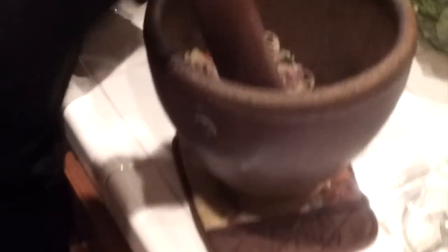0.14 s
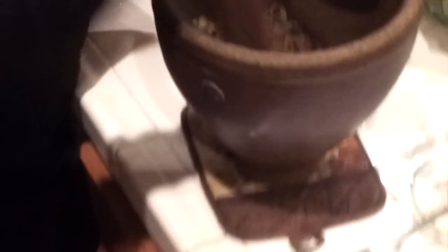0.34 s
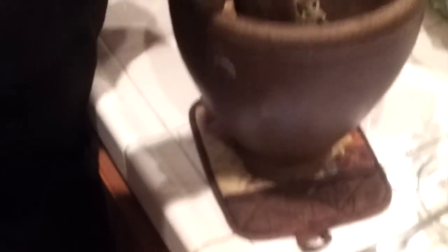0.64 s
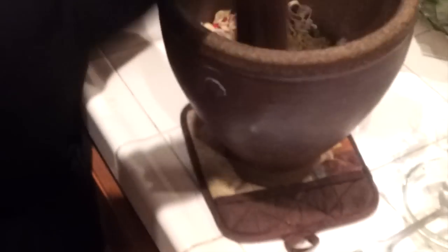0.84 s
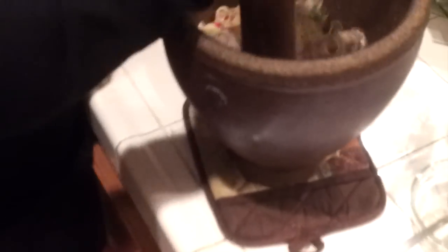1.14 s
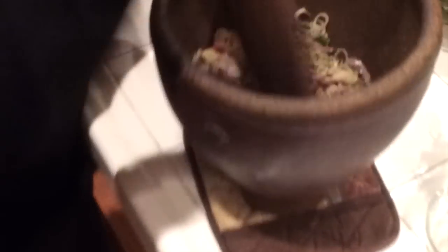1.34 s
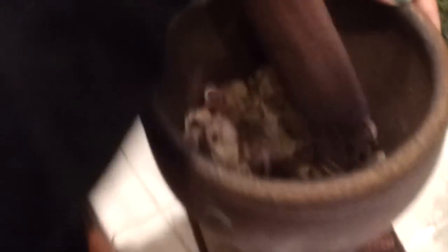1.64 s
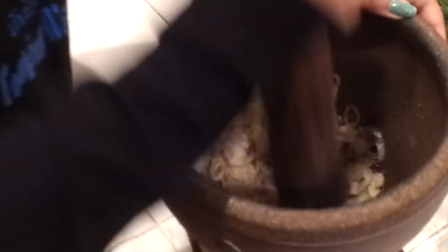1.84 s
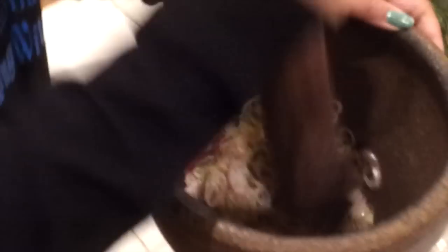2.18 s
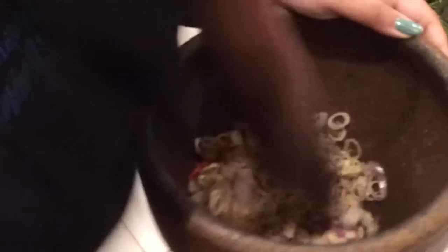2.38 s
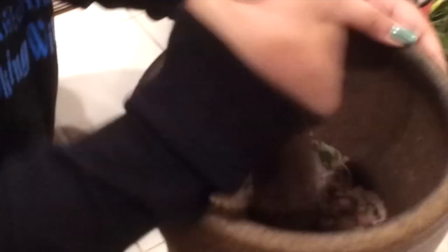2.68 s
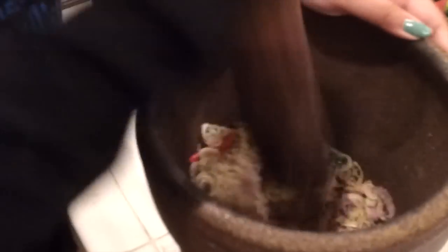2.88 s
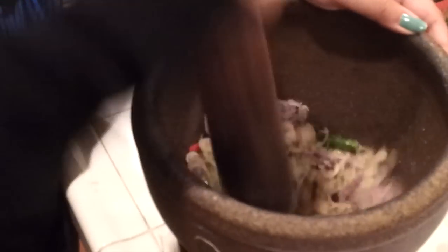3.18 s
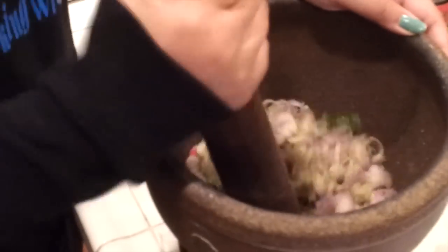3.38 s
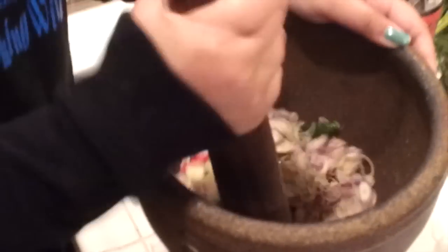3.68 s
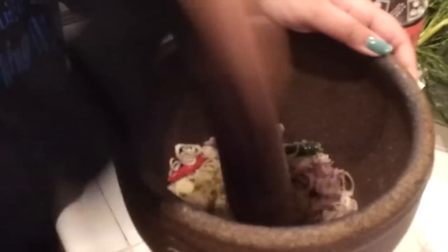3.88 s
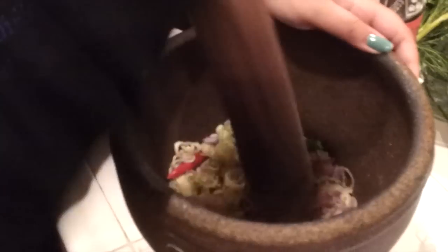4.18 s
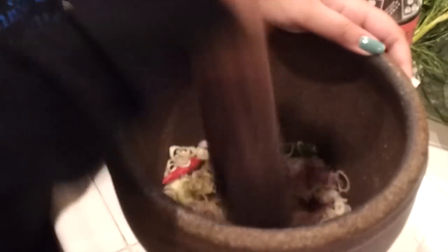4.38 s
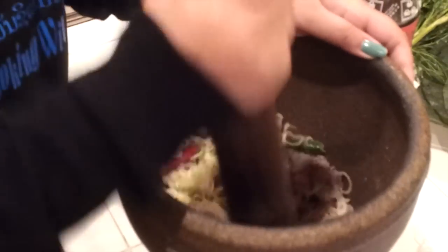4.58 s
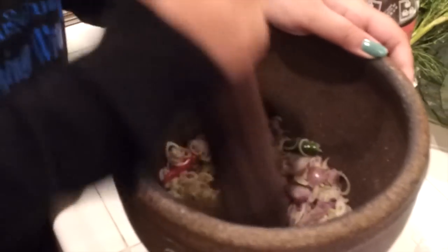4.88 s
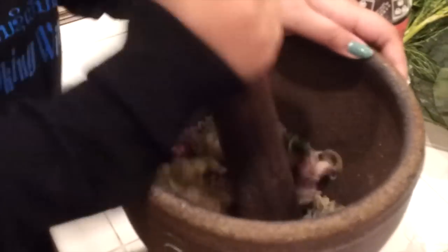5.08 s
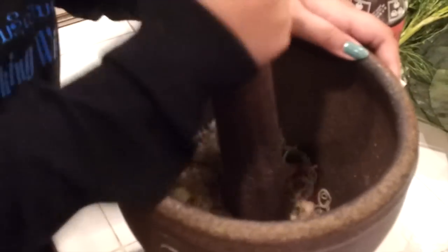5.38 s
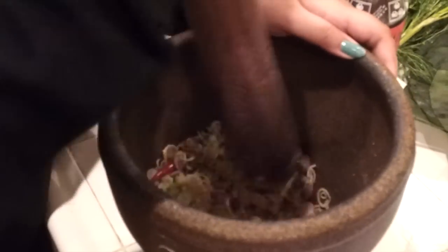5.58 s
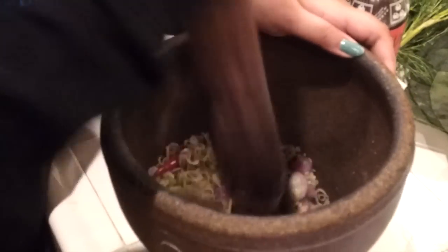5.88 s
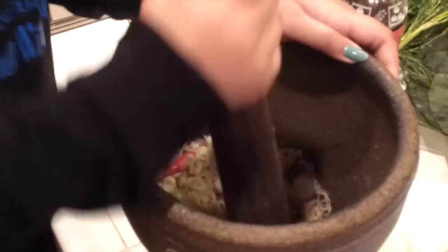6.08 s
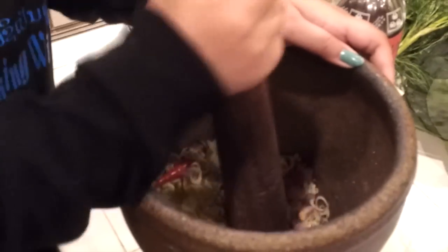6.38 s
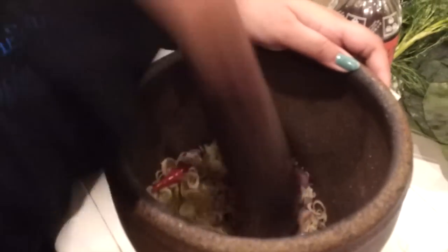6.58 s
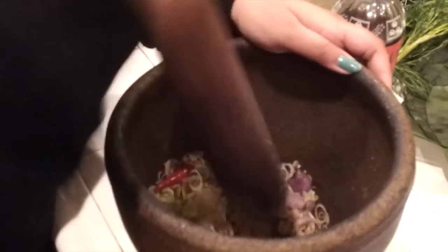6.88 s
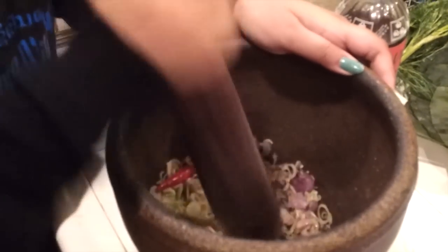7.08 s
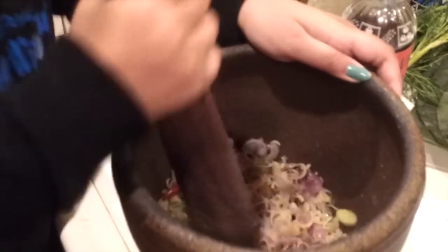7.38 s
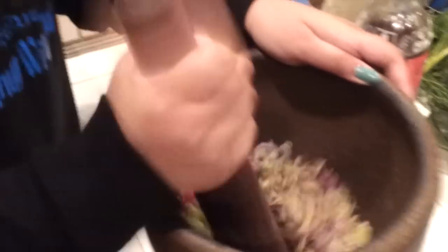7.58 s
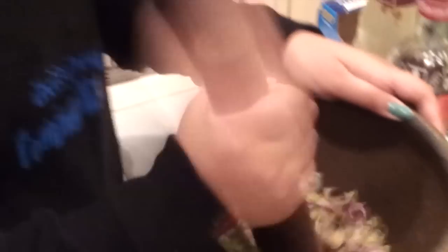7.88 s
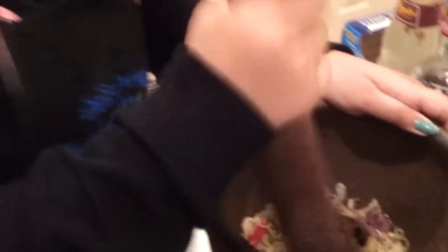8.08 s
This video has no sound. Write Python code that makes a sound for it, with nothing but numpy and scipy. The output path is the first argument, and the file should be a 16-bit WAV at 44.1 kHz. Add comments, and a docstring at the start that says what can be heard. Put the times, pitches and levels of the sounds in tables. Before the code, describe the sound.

Close up in a small tiled kitchen, a wooden pestle pounds sliced herbs in a clay mortar at about three strokes a second. Each stroke gives a short fibrous crunch and a low padded thud through the counter. Early strokes are softer; a few later ones crack loudly on bare clay, and glass and metal on the counter rattle briefly. Faint room hiss stays beneath.

```python
"""On a padded kitchen counter a wooden pestle pounds sliced herbs in a clay mortar, about three strokes a second.
Snapping fibres crunch as filtered pulses; thumps excite decaying modes of the counter and a cupboard rumble.
Knocks ring the clay modes, at some strokes glass and metal chatter, and a faint squeak and bumps occur.
Shaped noise gives the room's hiss, and convolution with decaying noise gives its echoes."""
import sys
import numpy as np
from scipy import signal
from scipy.fft import rfft, irfft
from scipy.io import wavfile
from scipy.ndimage import uniform_filter1d

SR = 44100
rng = np.random.default_rng(int(sys.argv[2]) if len(sys.argv) > 2 else 0)


def wav_record(signal):
    """Record a signal, one row per channel, as 16-bit PCM in the file named by sys.argv[1]."""
    frames = np.transpose(np.atleast_2d(signal))
    bounded = np.clip(frames, -1, 1)
    # unit amplitude maps onto the largest positive 16-bit level
    quanta = np.round(bounded * 32767).astype(np.int16)
    wavfile.write(sys.argv[1], SR, quanta)


N = 363384

# All levels in the tables are relative.
# room noise: (time [s], hum level [dB], hiss level [dB])
ROOM_NOISE = [(0, -54, -52), (1.0, -55, -55), (3.0, -55.5, -55), (5.0, -55, -55.5), (7.0, -57, -57.5),
              (8.24, -55, -58)]
# room noise spectrum: (frequency [Hz], density [dB per Hz])
ROOM_NOISE_COLOUR = [(18, -45), (30, -25), (59, 1), (187, 5.5), (787, 2), (1110, 1), (2240, -6),
                     (6540, -2.5), (11300, -16), (13600, -15.5), (15500, -27)]
# faint soft bumps nearby: (time [s], level [dB], frequency [Hz])
BUMPS = [(.004, -39, 714), (0.086, -42.5, 305), (.115, -44, 417), (.160, -48, 231), (0.565, -45, 216)]
# reverberation bands: (centre [Hz], t60 [s], echo level [dB])
ECHO_BANDS = [(125, 0.3, -13.5), (356, 0.4, -8.5), (950, 0.49, -12.5), (2470, 0.54, -15.5),
              (5800, 0.48, -16.5), (11900, 0.42, -16.5)]
# pushes into the herbs: (first bite [s], bite level [dB], delay to full pressure [ms],
# crush level [dB], letting go by 10 dB [ms], extra bass [dB])
HERB_PUSHES = [(0.35, -41, 42, -32, 36, -2), (.399, -45, 21, -26.5, 19, 0.5),
               (0.739, -34, 21, -30.5, 33, 1), (1.072, -32, 17, -26.5, 25, 4), (1.406, -45, 14, -27, 43, 7),
               (1.737, -27, 19.5, -19.5, 8.8, -4), (2.058, -36, 9.4, -20, 15.5, 0),
               (2.41, -39, 25.5, -25, 14.7, 6), (2.702, -33, 18.5, -22, 9, 1), (2.997, -52, 23, -23, 15, 4),
               (3.342, -29.5, 18.5, -18.5, 9.7, 0.5), (3.639, -25.5, 19, -22, 13, 1),
               (3.908, -43, 18.7, -25.5, 12, 7), (4.218, -39, 12.4, -23.5, 20, 4.5),
               (4.507, -35, 13, -22, 16, 8), (4.794, -48, 8.3, -19, 7.1, 0), (4.817, -43, 10, -31, 24, 8),
               (5.077, -25.5, 20.7, -23, 10.6, -0.5), (5.358, -34, 27.4, -27, 6.2, 4),
               (5.682, -39.5, 16, -22, 14.4, 3.5), (6.009, -26.5, 17, -20.5, 11, 0),
               (6.337, -34, 18, -25, 88, 10), (6.638, -46.5, 13.2, -22.5, 7.2, 3.5),
               (6.953, -37, 15.5, -22.5, 16, 11.5), (7.273, -30.5, 35.4, -25, 11.5, 3),
               (7.588, -44.5, 21, -23, 9.8, 10), (7.899, -24, 20.4, -22, 8, -1),
               (8.191, -25, 24, -22.5, 20, -16)]
# crunch spectrum: (frequency [Hz], density [dB per Hz])
HERB_COLOUR = [(250, -21.5), (450, -15), (800, -17), (1200, -9), (1900, 0.5), (4600, -4.5), (6000, 0),
               (8000, -8), (12500, -22), (15000, -20)]
# pestle jarring the clay, hard on the bare wall or dull through the herbs:
# (time [s], level [dB], extra hollow modes [dB], extra wall modes [dB])
KNOCKS = [(0.351, -28.5, 8, 0), (.381, -29.5, -16, -2), (.755, -44.5, 25, 15), (1.108, -34.5, -7, 15),
          (1.414, -42, 26, -6), (1.745, -42, 23, 7), (2.068, -28, 18, 3), (3.341, -22.5, -9, -19),
          (3.637, -21, 17, 8), (3.943, -20.5, 4, 11), (4.26, -27, 7, -8), (4.497, 8.5, -4, -1.5),
          (4.819, -43, -1, 18), (5.066, -25, -8, -20.5), (5.378, -30.5, 7, -11), (6.017, -23.5, 0.5, -7),
          (6.373, -9.5, -4, 1), (6.641, -28, 6, -6), (6.983, -14.5, -6.5, 4), (7.575, -1, 2.5, -11),
          (7.579, -5, -15, 4.5), (7.583, -8.5, -11, -14), (7.893, -26, -12, -21), (8.178, 2, 3, -2)]
# modes of the clay bowl: (frequency [Hz], level [dB], t60 [s])
MORTAR_MODES = [(440, -14.5, 0.045), (445, -19.5, 0.089), (497, -25.5, 0.033), (723.8, -15, 0.23),
                (757, -16.5, 0.2), (824, -17.5, 0.11), (943, -21.5, .09), (1015, -17.5, 0.08),
                (1153, -15, 0.11), (1221, 2.5, 0.032), (1166, -14.5, 0.15), (1246, -17.5, 0.1),
                (1310, -40, 0.095), (1291, -24, 0.13), (1312, -39, 0.22), (1817, -16.5, 0.066),
                (1980, -17.5, 0.048), (2453, -16.5, 0.04), (2805, -10.5, 0.03), (3410, -20, 0.064),
                (3730, -28, 0.029), (4040, -16.5, 0.047), (5460, -2.5, 0.011)]
# thumps on the counter: (time [s], low mode level [dB], upper mode level [dB])
THUMPS = [(0.353, -47.5, -47), (0.759, -31, -36), (1.087, -37, -34), (1.424, -36, -26.5),
          (1.764, -41.5, -51), (2.072, -35.5, -39.5), (2.437, -39, -34.5), (2.726, -33.5, -38.5),
          (3.021, -28.5, -41), (3.357, -37, -40.5), (3.636, -33, -38.5), (3.923, -26.5, -25.5),
          (4.236, -28.5, -30), (4.493, -36.5, -35.5), (4.812, -31, -34.5), (5.071, -45, -43.5),
          (5.39, -36.5, -47.5), (5.71, -31, -39.5), (6.025, -33, -40.5), (6.354, -23.5, -24.5),
          (6.662, -33.5, -38.5), (6.966, -28.5, -24.5), (7.276, -47.5, -47), (7.573, -43, -41),
          (7.91, -39.5, -41), (8.174, -43, -36)]
# modes of the counter: (frequency [Hz], level [dB], t60 [s])
COUNTER_MODES = [(64.5, -5, 0.24), (58.5, -2, 0.23), (76.7, -3.5, 0.17), (98, -12, 0.13), (129.4, 1, 0.124),
                 (166, -4, 0.099), (209.5, -10.5, 0.14), (291.5, -8, 0.092), (405, -6.5, 0.061)]
# cupboard rumble spectrum: (frequency [Hz], density [dB per Hz])
RUMBLE_COLOUR = [(35, -14), (60, 3), (130, 7.5), (250, -1.5), (450, -27.5)]
# things jumping on the counter: (time [s], ring level [dB], dull clatter level [dB], high ring level [dB])
JUMPS = [(.772, -27, -33, -60), (1.1, -22.5, -28, -51), (1.442, -15, -17, -17.5),
         (1.451, -18.5, -22, -18.5), (1.738, -32, -23.5, -37), (2.735, -36, -30, -62),
         (3.037, -28, -36, -57), (3.943, -15, -12, -19), (3.957, -20, -13, -50),
         (4.259, -13.5, -16.5, -21.5), (4.817, -19.5, -25, -27), (5.714, -19, -30.5, -33),
         (6.376, -16, -6, -15.5), (6.393, -13, -15.5, -26), (6.398, -9.5, -13, -10), (6.668, -33, -28, -38),
         (6.985, -16, -16, -30), (6.991, -11, -10.5, -16.5), (7.001, -10.5, -14.5, -18),
         (7.024, -23, -32, -38)]
# modes of the glass and metal before detuning: (frequency [Hz], level [dB], t60 [s])
CROCKERY_MODES = [(950, -9.5, 0.008), (1502, 5.5, 0.0048), (1517, -14.5, 0.054), (1889, -15, 0.089),
                  (2637, -5, 0.015), (3447, -7.5, 0.039), (3640, -14, 0.036), (4160, -14, 0.0059),
                  (4500, -11.5, 0.016), (5550, -12.5, 0.051), (6180, -4, 0.019), (6446, -8.5, 0.037),
                  (6330, 0.5, 0.024), (7000, -6, 0.024), (6910, -11.5, 0.05), (6740, -17, 0.14),
                  (6600, 0, 0.038), (7200, -8.5, 0.045), (8200, -6.5, 0.0183), (9280, -12, 0.087),
                  (9810, -3.5, 0.024), (11000, -22, 0.057), (11670, -18.5, 0.096), (13700, -16, 0.076),
                  (13420, -10, 0.034), (14100, -13.5, 0.0406), (14330, -5, 0.04)]
# spectrum of grating contacts: (frequency [Hz], density [dB per Hz])
GRATING_COLOUR = [(500, -29), (1200, 4.5), (2000, -9.5), (4500, 1), (7000, -27), (10000, -24.5),
                  (15000, -32)]
# faint thin squeak: (time [s], length [s], frequency [Hz], level [dB])
SQUEAKS = [(3.495, .12, 3570, -54)]

# Rise and fall times of pressure are those of a 10 dB change.
BITE_RISE_MS, BITE_FALL_MS, BITE_BASS_DB, BITE_TREBLE_DB = 3.8, 6.3, 4, 7
SWELL_SHARE, CRUSH_TREBLE_DB = 0.85, -0.7   # crush rise as a share of the delay after the bite
# the rustle as the pestle lifts after a thump
RUSTLE_AFTER_S, RUSTLE_DB, RUSTLE_RISE_MS, RUSTLE_FALL_MS = 0.12, -54.5, 73, 25
RUSTLE_BASS_DB, RUSTLE_TREBLE_DB = -1, 6
LOW_CUT_HZ, STOPBAND_HZ = 50.6, 16000


def from_db(db):
    """Logarithmic level: converts decibels to an amplitude ratio."""
    return 10 ** (np.asarray(db, float) / 20)


def rms_one(x):
    """Normalisation: scales a signal to unit rms."""
    return x / np.sqrt(np.mean(x ** 2) + 1e-20)


def coloured(x, colour, low=10, high=22000):
    """Spectral shaping: the part between two frequencies of a coloured signal; the whole spectrum has rms 1."""
    hz = np.maximum(np.fft.rfftfreq(N, 1 / SR), 1)
    corner_hz, corner_db = np.transpose(colour)
    gain = from_db(np.interp(np.log(hz), np.log(corner_hz), corner_db))
    part = 1 / (1 + (low / hz) ** 6) - 1 / (1 + (high / hz) ** 6)
    spectrum = rfft(rms_one(x)) * gain * part
    return irfft(spectrum / np.sqrt(np.mean(gain ** 2)), N)


def ring(times, gains, hz, t60):
    """Impulse response of a damped resonator: each click sets a decaying sine of its own height ringing."""
    clicks = np.full(N, 1e-18)
    at = np.minimum((np.ravel(times) * SR).astype(int), N - 1)
    np.add.at(clicks, at, np.ravel(gains))
    r, w = from_db(-60 / (t60 * SR)), 2 * np.pi * hz / SR
    return signal.lfilter([0, np.sin(w)], [1, -2 * r * np.cos(w), r * r], clicks)


def hiss():
    """Stationary broadband noise: the kitchen's hum and hiss are two bands of one noise with slowly moving levels."""
    s, hum_db, hiss_db = np.transpose(ROOM_NOISE)
    t, white = np.arange(N) / SR, rng.standard_normal(N)
    low_band = rms_one(coloured(white, ROOM_NOISE_COLOUR, high=1510))
    high_band = rms_one(coloured(white, ROOM_NOISE_COLOUR, low=1260))
    hum = from_db(np.interp(t, s, hum_db)) * low_band
    return hum + from_db(np.interp(t, s, hiss_db)) * high_band


def bumps():
    """Damped resonance under a soft force: each short bump is a decaying sine smoothed by a brief contact."""
    contact = np.hanning(round(0.0016 * SR))
    rings = sum(ring(s, from_db(level_db), hz, 0.12) for s, level_db, hz in BUMPS)
    return np.convolve(rings, contact / contact.sum())[:N]


def kitchen(x):
    """Reverberation: dense echoes off tiles and cupboards are noise that builds up, then dies band by band."""
    t, tail = np.arange(SR) / SR, 0
    centres = np.transpose(ECHO_BANDS)[0]
    edges = np.r_[30, np.sqrt(centres[1:] * centres[:-1]), 19000]
    onset = 1 - np.exp(-(t / 0.013) ** 2)   # the echoes start after the first wall
    for (_, t60, echo_db), low, high in zip(ECHO_BANDS, edges, edges[1:]):
        band_filter = signal.butter(2, [low, high], "band", fs=SR, output="sos")
        band = rms_one(signal.sosfilt(band_filter, rng.standard_normal(SR)))
        dying = from_db(-60 * t / t60) * onset
        bandwidth_share = (high - low) / (SR / 2)
        tail = tail + from_db(echo_db) * band * dying * np.sqrt(bandwidth_share / np.sum(dying ** 2))
    return signal.fftconvolve(x, tail)[:N]


def pressures():
    """Loading and release: every rustle, bite and crush as
    (peak time [s], level [dB], rise [ms], fall [ms], extra bass [dB], extra treble [dB])."""
    rustle = (RUSTLE_DB, RUSTLE_RISE_MS, RUSTLE_FALL_MS, RUSTLE_BASS_DB, RUSTLE_TREBLE_DB)
    rows = [(s + RUSTLE_AFTER_S, *rustle) for s, *_ in THUMPS[:-1]]
    for s, bite_db, swell_ms, crush_db, fall_ms, bass_db in HERB_PUSHES:
        rows.append((s, bite_db, BITE_RISE_MS, BITE_FALL_MS, BITE_BASS_DB, BITE_TREBLE_DB))
        full_s = s + swell_ms / 1000
        rows.append((full_s, crush_db, SWELL_SHARE * swell_ms, fall_ms, bass_db, CRUSH_TREBLE_DB))
    return rows


def herbs(snaps_per_s, spread_db, ring_db, clump_db):
    """Fracture noise: fibres snap at random, each with a short pitch, as the pressure swells and lets go."""
    snapping = rng.random(N) < snaps_per_s / SR
    sizes = from_db(spread_db * np.minimum(rng.exponential(1, N), 4))
    snaps = snapping * rng.choice([-1, 1], N) * sizes
    clumps = np.repeat(rng.standard_normal(N // 130 + 1), 130)[:N]   # fibres give way in clumps of 3 ms
    snaps = snaps * from_db(clump_db * clumps)

    at, pitches = np.flatnonzero(snaps), np.geomspace(400, 11000, 22)
    dealt = rng.integers(0, 22, N // 200 + 1)[at // 200]   # snaps close in time come from the same piece
    rings = 0
    for k, hz in enumerate(pitches):
        own = at[dealt == k]
        rings = rings + np.sqrt(hz) * hz / 1000 * ring(own / SR, snaps[own], hz, 20.0 / hz)
    snaps = rms_one(snaps) + from_db(ring_db) * rms_one(rings)

    bass, body, treble = np.zeros((3, N))
    window = np.arange(-6000, 4400)
    ms = window / SR * 1000
    for s, level_db, rise, fall, bass_db, treble_db in pressures():
        near = np.clip(round(s * SR) + window, 0, N - 1)
        rising, falling = (-ms / rise).clip(0) ** 1.73, (ms / fall).clip(0) ** 0.68
        swell = from_db(level_db - 10 * np.where(ms < 0, rising, falling))
        for part, extra_db in ((bass, bass_db), (body, 0), (treble, treble_db)):
            part[near] = np.hypot(part[near], swell * from_db(extra_db))   # powers add
    out = bass * coloured(snaps, HERB_COLOUR, high=1525)
    out = out + body * coloured(snaps, HERB_COLOUR, 2380, 7960)
    return out + treble * coloured(snaps, HERB_COLOUR, low=7500)


def mortar():
    """Modal excitation: where and how hard the pestle lands sets the share of each group of clay modes."""
    s, level_db, hollow_db, wall_db = np.transpose(KNOCKS)
    out = 0
    for hz, mode_db, t60 in MORTAR_MODES:
        extra_db = hollow_db if hz < 550 else wall_db if hz < 850 else 0
        strength_db = level_db + extra_db + mode_db - 7.0 + rng.normal(0, 1.0, len(s))
        slope_gain = 2 * np.sin(np.pi * hz / SR)   # offsets the differencing below at the mode's pitch
        out = out + ring(s, from_db(strength_db), hz, t60) / slope_gain
    out = np.diff(out, prepend=0)   # the air answers to the wall's speed, which thins the sound below each mode
    contact = np.exp(-2 * np.pi * 4500 / SR)   # wood yields, so the force rises softly
    out = signal.lfilter([(1 - contact) ** 2], [1, -2 * contact, contact ** 2], out)
    # the bowl is too small to radiate bass
    return signal.sosfilt(signal.butter(4, 350, "high", fs=SR, output="sos"), out)


def counter():
    """Forced plate modes: the mortar's foot pushes through the pad and bounces once; the lowest swell slowest."""
    s, low_db, upper_db = np.transpose(THUMPS)
    pushes = s[:, None] + np.array([0, .014]) * rng.uniform(0.768, 1.098, (len(s), 2))
    out = 0
    for hz, mode_db, t60 in COUNTER_MODES:
        thump_db = low_db if hz < 80 else upper_db
        strength_db = thump_db[:, None] + mode_db + [0, -1] + rng.normal(0, 3.2, pushes.shape)
        push = np.hanning(round(0.53 / hz * SR))   # about half a cycle long
        rings = ring(pushes, from_db(strength_db), hz, t60)
        out = out + np.convolve(rings, push / push.sum())[:N]
    return out


def cupboard():
    """Energy build-up and decay: doors and contents under the counter rumble loosely after each thump."""
    s, low_db, upper_db = np.transpose(THUMPS)
    energy = np.zeros(N)
    energy[(s * SR).astype(int)] = from_db(upper_db - 13.5) ** 2 + from_db(low_db - 20.0) ** 2
    for tau in (.004, .03):   # seconds: a quick swell, then the dying away
        energy = signal.lfilter([1], [1, -np.exp(-1 / (tau * SR))], energy)
    return np.sqrt(energy / 150) * coloured(rng.standard_normal(N), RUMBLE_COLOUR)


def crockery():
    """Repeated impact: a jump is a touch and a dying chatter of loose pieces at near pitches; contacts also grate."""
    s, ring_db, clatter_db, high_db = np.transpose(JUMPS)
    touch = np.arange(14)
    after = .012 * rng.exponential(1, (len(s), 14)) * (touch > 1) + .001 * rng.random((len(s), 14))
    times = s[:, None] + after
    fading_db = -350 * after + 1.6 * (touch == 0)
    out = 0
    for hz, mode_db, t60 in CROCKERY_MODES:
        group_db = clatter_db if hz < 5000 else ring_db if hz < 8000 else high_db
        level_db = group_db + rng.normal(0, 3.87, len(s))
        scatter_db = rng.normal(0, 1.07, after.shape)
        strength = from_db(level_db[:, None] + mode_db - 9.5 + fading_db + scatter_db)
        piece = rng.integers(0, 3, after.shape)
        detune = 1 + (.015 if hz < 5000 else .007) * np.array([-1, 0, 1])
        for k in range(3):
            hits = strength * (piece == k) * rng.choice([-1, 1], after.shape)
            out = out + ring(times, hits, hz * detune[k], t60)
    contacts = np.zeros(N)
    np.add.at(contacts, (times * SR).astype(int), from_db(clatter_db[:, None] + fading_db - 18.0) ** 2)
    grating = np.sqrt(signal.lfilter([1], [1, -np.exp(-1 / (0.0041 * SR))], contacts))
    out = out + grating * coloured(rng.standard_normal(N), GRATING_COLOUR)
    return signal.sosfilt(signal.butter(2, 600, "high", fs=SR, output="sos"), out)


def squeak():
    """Amplitude modulation: a sine holds its pitch while slow noise roughens its strength."""
    t, out = np.arange(N) / SR, np.zeros(N)
    rough = rms_one(uniform_filter1d(rng.standard_normal(N), size=300))
    for s, length, hz, level_db in SQUEAKS:
        held = np.clip(np.minimum(t - s, s + length - t) / 0.0099, 0, 1)
        out = out + from_db(level_db) * held * (1 + 0.47 * rough) * np.sin(2 * np.pi * hz * t)
    return out


def scene():
    """Superposition: all sources, their echoes and the hiss add, alike on both sides."""
    blows = bumps() + herbs(snaps_per_s=9000, spread_db=-0.5, ring_db=-10.0, clump_db=1.5)
    blows = blows + mortar() + counter() + cupboard() + crockery() + squeak()
    return np.tile(blows + from_db(5) * kitchen(blows) + hiss(), (2, 1))


def record(dry):
    """Band limiting and saturation: a small microphone drops deep bass, loud peaks overload, the top is cut."""
    dry = signal.sosfilt(signal.butter(3, LOW_CUT_HZ, "high", fs=SR, output="sos"), dry)
    held = dry / (1 + np.abs(dry) ** 6) ** (1 / 6)
    return signal.sosfilt(signal.cheby2(10, 70, STOPBAND_HZ, fs=SR, output="sos"), .96 * held)


dry = scene()
out = record(dry)
wav_record(out)
```